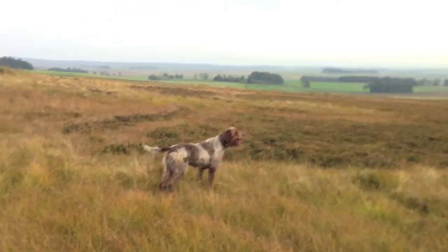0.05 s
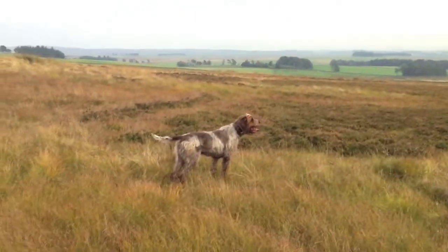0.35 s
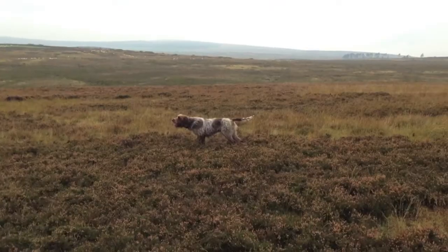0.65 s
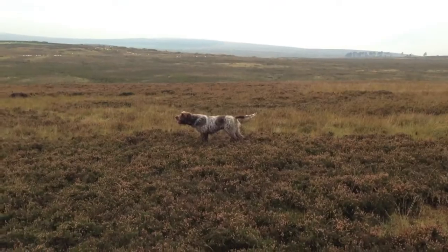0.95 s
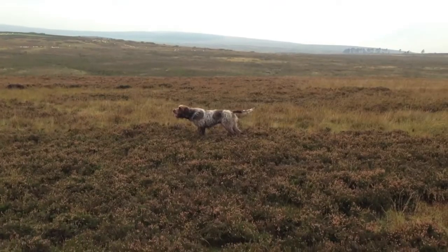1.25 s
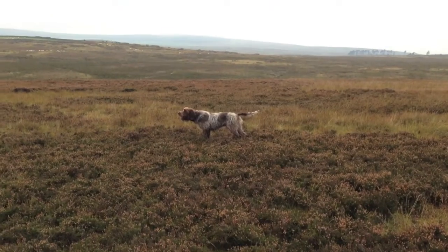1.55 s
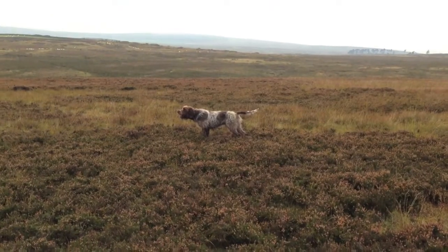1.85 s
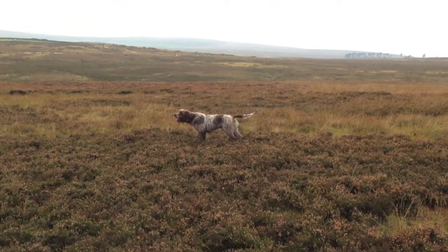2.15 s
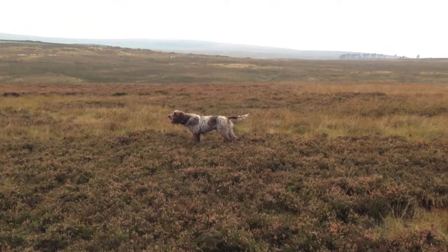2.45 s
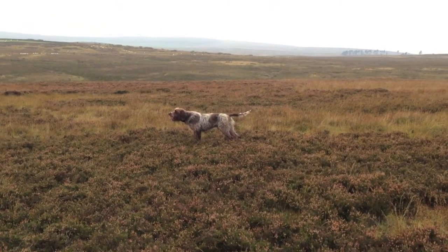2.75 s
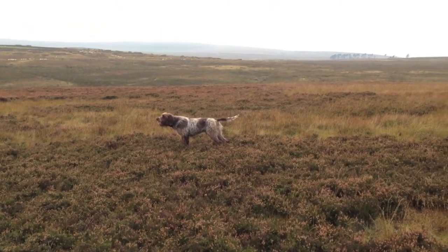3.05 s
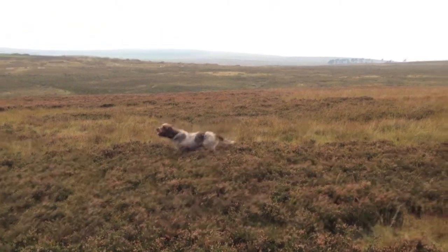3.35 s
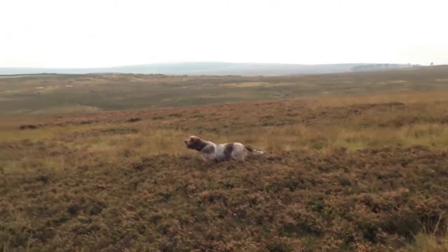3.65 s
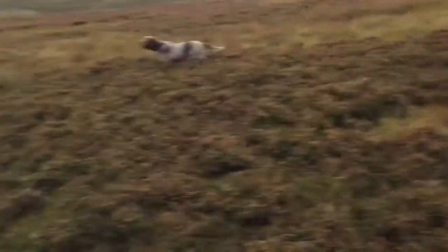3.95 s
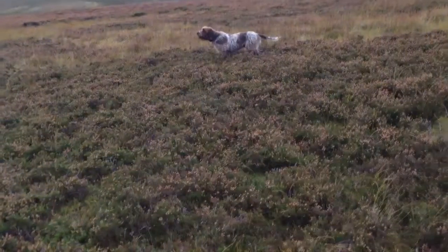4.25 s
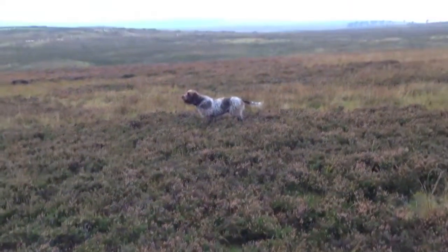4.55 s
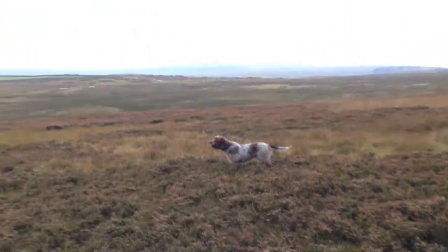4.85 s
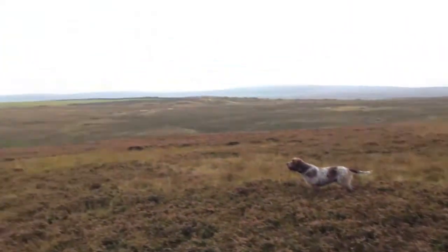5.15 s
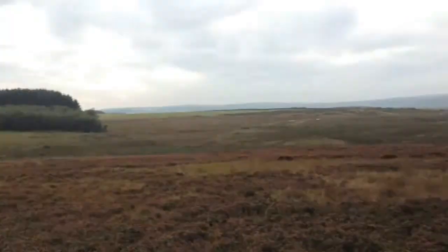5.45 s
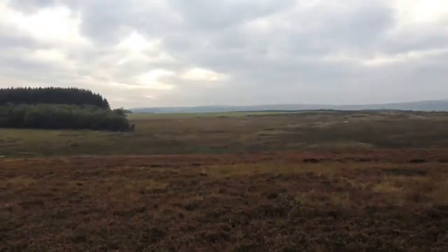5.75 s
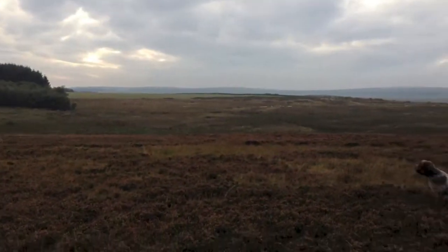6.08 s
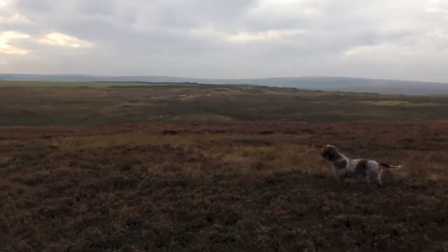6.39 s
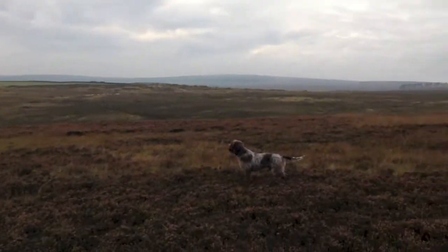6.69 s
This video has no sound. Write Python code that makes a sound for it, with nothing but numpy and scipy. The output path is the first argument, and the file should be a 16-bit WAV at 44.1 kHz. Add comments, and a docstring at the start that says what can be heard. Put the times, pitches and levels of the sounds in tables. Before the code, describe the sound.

Wind thumps on the microphone as a bird takes off with rapid wingbeats, amid rustling heather and snapping twigs.

```python
"""Gusts of wind on an open heather moor hit one small microphone in low, uneven thumps.
A grouse whirrs up, each quick wingbeat squeezing out a whup of air. Heather and grass rustle as
their stems touch, dry twigs snap, and a jacket swishes as its wearer turns and the cloth rubs.
Under it all lie a thin hiss and a few faint, far-off whistles.
Half a second in, the whole sound briefly fades out and comes back."""
import sys
import numpy as np
from scipy import signal
from scipy.fft import rfft, irfft
from scipy.io import wavfile
from scipy.ndimage import uniform_filter1d

SR = 44100
rng = np.random.default_rng(int(sys.argv[2]) if len(sys.argv) > 2 else 0)


def dump_mix(stems):
    """Bounce the given channels to the path in sys.argv[1] as a 16-bit WAV at rate SR."""
    frames = np.atleast_2d(stems).T  # one column per channel
    limited = np.clip(frames, -1, 1)  # hard clip at full scale
    pcm = np.round(limited * 32767).astype(np.int16)
    wavfile.write(sys.argv[1], SR, pcm)


N = 296352

# Tone of still air and microphone hiss; a tone table says how strong the lows and highs are
# (frequency [Hz], level [dB])
HISS_TONE = [(100, -6), (300, 9.5), (600, 1.5), (1300, -4.5), (2000, -2.5), (3000, 1), (4200, 2), (7000, 0),
             (10000, -.5), (15000, -1.86)]
# Far-off whistles (start [s], length [s], pitch [Hz], slide [share of pitch], level [dB])
WHISTLES = [(1.85, 0.38, 1650, .025, -79.5), (1.9, 0.56, 2324, -0.024, -78), (2.245, .5, 2420, 0.0044, -85),
            (2.728, 0.26, 1710, 0.0098, -80)]

# Jacket cloth sliding (start [s], hold [s], level [dB], centre frequency [Hz])
JACKET_RUBS = [(3.815, .02, -55, 2107), (3.865, 0.0354, -57.5, 2734), (4.09, .02, -62, 2200),
               (4.25, 0.051, -64, 2095), (4.43, 0.097, -64, 2000), (4.97, .15, -65.5, 2050),
               (5.3, 0.17, -70.5, 1694), (5.72, .12, -72, 1900)]
# How a rub spreads to either side of its centre (distance from centre [Hz], level [dB])
RUB_SPREAD = [(300, 0), (600, -4.5), (1100, -11.5), (2000, -3.5), (5000, -67)]

# Dry grass hissing in the first gust (time [s], level [dB])
GRASS_LEVELS = [(0, -64), (.04, -63), (.1, -67.5), (.2, -59), (.27, -61.5), (.36, -62.5), (.45, -66.5),
                (.52, -82)]
# Tone of the grass (frequency [Hz], level [dB])
GRASS_TONE = [(300, 0.5), (800, 2.5), (1800, 1.9), (4000, -1), (8000, -3), (15000, -5.5)]
# Heather stirring, building up and settling (time [s], level [dB])
HEATHER_LEVELS = [(0, -99), (3.1, -75.5), (3.22, -65.5), (3.55, -63.5), (3.9, -61), (4.0, -64.5),
                  (4.2, -65), (4.5, -70), (5.3, -71.5), (5.8, -74)]
# Harder brushes through the stems (start [s], hold [s], level [dB])
HEATHER_BRUSHES = [(3.139, 0.014, -61), (3.7, 0.042, -61.5), (3.795, 0.046, -54.5), (3.863, 0.023, -55.5)]
# Tone of the heather (frequency [Hz], level [dB])
HEATHER_TONE = [(250, 0), (550, 5.5), (1000, 1), (2000, 1), (4000, -2.5), (7000, -3.5), (10000, -8),
                (15000, -16)]
# Tone of its dry tips flicking (frequency [Hz], level [dB])
CRACKLE_TONE = [(1000, -14), (3000, -8), (5500, 4.5), (9000, -7), (15000, -6)]
# Twigs ticking and snapping (time [s], level [dB], centre frequency [Hz], band width [Hz], decay [s])
TWIG_SNAPS = [(1.036, -67, 1286, 909, 0.0036), (2.215, -64.5, 3480, 6000, 0.0044),
              (3.209, -57, 4480, 8000, .0018), (3.23, -59.5, 3750, 7100, 0.0052),
              (3.296, -57, 1450, 600, .004), (3.538, -64, 7000, 8100, .002), (3.608, -56, 2160, 2500, .002),
              (3.7, -49.5, 2960, 5440, 0.0011), (3.82, -49, 2320, 1200, .0018),
              (3.827, -41, 2130, 2950, 0.0016), (3.8287, -41, 1160, 1130, 0.0015),
              (3.832, -54, 3340, 3940, 0.00057), (3.8755, -47, 6500, 13000, 0.0007),
              (4.009, -63, 6000, 4000, 0.0036), (4.197, -59, 2300, 1500, 0.0097),
              (4.2018, -35.5, 2340, 1450, 0.001), (4.237, -60, 1700, 1470, 0.0063),
              (4.3335, -57.5, 2730, 3500, 0.0021), (4.48, -49, 2050, 508, 0.0023),
              (4.482, -60.5, 5970, 3990, .0033), (4.621, -64, 4500, 5000, 0.0036),
              (4.788, -54, 2374, 1300, 0.0017), (4.826, -60.5, 4610, 2800, .0033),
              (4.895, -60.5, 2820, 3020, .002), (5.085, -60, 610, 450, .004),
              (5.12, -61, 1830, 1000, 0.0026), (5.31, -64, 1960, 1500, .003),
              (5.74, -60.5, 4870, 1500, 0.0029), (6.239, -64.5, 3200, 1800, .003),
              (6.581, -56, 2600, 1300, 0.0017)]

# Wing strokes (time [s], peak level [dB], pitch [Hz], half length [s], feather swish level [dB])
WINGBEATS = [(3.2968, -37.5, 950, 0.00047, -49.5), (3.359, -35.5, 676, 0.0025, -54),
             (3.4263, -37.5, 537.3, 0.0023, -52), (3.4878, -35, 607, 0.0033, -49.5),
             (3.551, -38.5, 560, 0.0017, -52), (3.617, -41.5, 560, 0.0023, -54),
             (3.681, -42, 565, 0.0021, -60), (3.6990, -27, 486, 0.0012, -47),
             (3.749, -52, 600, 0.0033, -73), (3.7650, -46, 600, 0.0019, -77),
             (3.782, -33.5, 342, 0.00073, -74), (3.797, -32.5, 200, 0.0013, -48.5)]
# Tone of the swishing feathers (frequency [Hz], level [dB])
FEATHER_TONE = [(300, -6), (750, 13.5), (1400, 0), (3000, -4.5), (7000, -8), (15000, -20)]

# Light breeze between the gusts (time [s], rumble level [dB])
BREEZE_LEVELS = [(0, -57), (.73, -67.5), (1.0, -50), (2.3, -63), (3.1, -61.5), (3.9, -53), (4.25, -58.5),
                 (4.55, -71), (4.8, -56.5), (5.6, -53.5), (6.7, -53.5)]
# Gusts hitting the microphone (start [s], hold [s], rumble level [dB], thumping level [dB])
GUSTS = [(0, 0.069, -53.5, -53.5), (0.128, 0.34, -54.5, -57.5), (0.532, 0.038, -45.5, -47.5),
         (.835, 0.048, -47, -55), (1.032, 0.085, -36, -45), (1.184, .32, -44.5, -44),
         (1.53, 0.14, -56.5, -58), (1.788, .021, -44, -56), (2.1, 0.11, -50.5, -57.5),
         (2.54, 0.18, -61, -75), (3.229, .13, -59, -54), (3.443, 0.17, -50.5, -54),
         (3.79, 0.0086, -44, -46.5), (3.934, 0.2, -38.5, -43), (4.873, 0.026, -39, -53.5),
         (4.978, 0.13, -50, -64), (5.308, 0.067, -43, -55.5), (5.399, 0.12, -39.5, -45.5),
         (5.811, 0.052, -35, -36), (5.897, .21, -40, -51), (6.146, 0.082, -40, -39),
         (6.319, 0.068, -41.5, -53.5)]
# Single strong swirls of air (time [s], level [dB], pitch [Hz], half length [cycles])
SWIRLS = [(.340, -36.5, 203, .55), (0.55, -26, 255, 0.23), (0.901, -32, 141, 0.52), (1.032, -28, 175, 0.21),
          (1.106, -26, 220, 0.23), (1.205, -31, 256.8, 0.23), (1.261, -27, 338, 0.33),
          (1.318, -20, 245, 0.32), (1.403, -28.5, 79, 0.26), (1.454, -34.5, 268, 0.56),
          (1.486, -24.5, 260, .36), (1.669, -41.5, 166, 0.4), (1.808, -37.5, 153, 0.23),
          (3.932, -30, 152, 0.37), (3.959, -23, 190, 0.4), (3.997, -13.5, 229, 0.25),
          (4.044, -33, 149, .38), (4.085, -17.5, 293, .29), (4.095, -26, 330, 0.28),
          (4.106, -25.5, 212, 0.31), (4.136, -27.5, 129.8, 0.34), (4.787, -42, 149, 0.46),
          (5.423, -28.5, 124, 0.47), (5.437, -23, 180, 0.25), (5.497, -23.5, 246, 0.25),
          (5.821, -26.5, 216.7, 0.76), (5.832, -20.5, 232, 0.61), (5.857, -17, 169, 0.44),
          (5.937, -26.5, 200, 0.25), (6.083, -33.5, 176, 0.25), (6.176, -27, 250, 0.7),
          (6.189, -30, 320, 0.48), (6.225, -36, 199, 0.53), (6.368, -35, 151, 0.55)]
# Tones of big, middle-sized and tiny swirls in the wind (frequency [Hz], level [dB])
RUMBLE_TONE = [(15, -65), (28, -15.5), (45, -5), (65, 2.5), (100, -4), (135, -10), (200, -34),
               (400, -67)]
THUMP_TONE = [(70, -52), (125, 5.5), (180, 1.5), (250, -4.5), (350, -19), (500, -27.5), (800, -48),
              (1500, -77)]
FLUTTER_TONE = [(150, -10), (280, 5), (430, 5), (600, -11.5), (850, -30), (1500, -70), (3000, -87.5)]

# Overall volume with one brief dip; it scales every level above (time [s], gain [factor])
VOLUME = [(.43, 0.68), (.48, 0.35), (.509, 0.011), (.518, 0.0062), (.53, 0.16), (.6, 0.59)]


def undb(db):
    """Turn decibels into a gain, the number a sound is multiplied by."""
    return 10 ** (np.asarray(db) / 20)


def curve(rows):
    """Join (time, value) points with straight lines, giving a value for every sample."""
    times, values = np.transpose(rows)
    return np.interp(np.arange(N) / SR, times, values)


def unit(x):
    """Scale a sound to an average strength (rms) of 1."""
    return x / np.sqrt(np.mean(x ** 2) + 1e-30)


def colour(x, tone):
    """Shape a sound's lows and highs with a tone table; the result has strength 1."""
    hz, db = np.transpose(tone)
    freqs = np.maximum(np.fft.rfftfreq(N, 1 / SR), 1)
    gain = undb(np.interp(np.log(freqs), np.log(hz), db))
    return unit(irfft(rfft(x) * gain, N))


def band(x, hz, width_hz, order=2):
    """Keep only the frequencies around hz; the result has strength 1."""
    low = np.sqrt(hz ** 2 + (width_hz / 2) ** 2) - width_hz / 2
    edges = [low, min(low + width_hz, SR / 2 - 1000)]
    return unit(signal.sosfilt(signal.butter(order, edges, "band", fs=SR, output="sos"), x))


def noise():
    """White noise: all frequencies equally strong."""
    return rng.standard_normal(N)


def even(x, span_s):
    """Keep the quick flutter of a noise but hold its strength steady over longer spans."""
    size = max(int(span_s * SR), 2)
    power = uniform_filter1d(uniform_filter1d(x ** 2, size), size)
    return x / np.sqrt(power + 1e-9)


def clicks(per_s, spread_db):
    """Random clicks; a bigger spread makes their sizes more unequal."""
    hits = (rng.random(N) < per_s / SR) * noise()
    return hits * undb(spread_db * np.minimum(rng.exponential(size=N), 5))


def swell(start_s, hold_s, rise_s, fall_s):
    """A gain that grows, holds at 1 and dies away."""
    t = np.arange(N) / SR - start_s
    return np.exp(np.minimum(t, 0) / rise_s - np.maximum(t - hold_s, 0) / fall_s)


def together(gains):
    """Joint strength of unrelated sounds: their powers add."""
    return np.sqrt(sum(g ** 2 for g in gains) + 1e-18)


def add(out, start_s, sound):
    """Mix a sound in from the given time."""
    i = max(int(start_s * SR), 0)
    out[i:i + len(sound)] += sound[:N - i]


def hiss():
    """Still air and the microphone itself give a thin, steady hiss."""
    return colour(noise(), HISS_TONE) * undb(-64)


def whistles():
    """Barely audible far-off tones that waver and slide a little in pitch."""
    out = np.zeros(N)
    for start_s, length_s, hz, slide, db in WHISTLES:
        progress = np.linspace(0, 1, int(length_s * SR))
        waver = 0.0033 * unit(uniform_filter1d(rng.standard_normal(len(progress)), size=900))
        pitch = hz * (1 + slide * (progress - .5) + waver)
        tone = np.sin(2 * np.pi * np.cumsum(pitch) / SR)
        add(out, start_s, undb(db) * np.sin(np.pi * progress) * tone)
    return out


def jacket():
    """Threads slip over each other in a broad swish, higher for a faster rub."""
    rubs = [undb(db) * swell(s, hold_s, rise_s=.032, fall_s=.042) for s, hold_s, db, _ in JACKET_RUBS]
    centre_hz = curve([(s + hold_s / 2, hz) for s, hold_s, _, hz in JACKET_RUBS])
    slips = colour(clicks(5000, 0.45), RUB_SPREAD)
    # multiplying by a tone moves the noise up around that tone
    swish = unit(slips * np.cos(2 * np.pi * np.cumsum(centre_hz) / SR))
    return swish * together(rubs)


def grass():
    """Dry blades touch so often that their clicks blur into a smooth hiss."""
    return colour(clicks(20000, 2.4), GRASS_TONE) * undb(curve(GRASS_LEVELS))


def heather():
    """Countless stems touch and scrape in a rustle, and their dry tips flick and crackle."""
    # a stem that springs free scrapes for a millisecond or so
    scrapes = signal.fftconvolve(np.abs(clicks(90, 1.9)), np.hanning(70))[:N] * noise()
    contacts = unit(clicks(5000, 2.6)) + .55 * unit(scrapes)
    stirring = undb(curve(HEATHER_LEVELS))
    brushes = [undb(db) * swell(s, hold_s, rise_s=.005, fall_s=.015)
               for s, hold_s, db in HEATHER_BRUSHES]
    rustle = colour(contacts, HEATHER_TONE) * together([stirring, *brushes])
    crackle = even(colour(clicks(110, 0.86), CRACKLE_TONE), span_s=0.13)
    return rustle + crackle * stirring * undb(-6)


def twigs():
    """Dry stems crack: a snap makes the stem ring, fibres tear briefly, then a faint shiver."""
    out = np.zeros(N)
    t = np.arange(SR // 10) / SR
    for time_s, db, hz, width_hz, decay_s in TWIG_SNAPS:
        ring = band(signal.unit_impulse(len(t)), hz, 1.7 * width_hz, order=4)
        snap = ring / np.abs(ring).max()
        tear = even(band(rng.standard_normal(len(t)), hz, width_hz, order=4), span_s=0.0044)
        rise = 1 - np.exp(-t / 0.00027)
        shiver = undb(-13) * np.exp(-t / 0.0056)
        shape = rise * (np.exp(-t / decay_s) + shiver)
        add(out, time_s, undb(db) * (0.97 * snap + 1.89 * tear * shape))
    return out


def whup(t, hz, half_s, slide):
    """The air pushed by one wing stroke: a short pressure wave that slides in pitch."""
    u = t / half_s
    return np.exp(-u ** 2 / 2) * np.cos(2 * np.pi * hz * t * (1 + slide * u / 2))


def grouse_wings():
    """Each downstroke swishes the feathers and squeezes out a falling whup that bounces off the ground."""
    whups, swish_gain = np.zeros(N), np.zeros(N)
    t = np.arange(-SR // 20, SR // 20) / SR
    for time_s, db, hz, half_s, feather_db in WINGBEATS:
        add(whups, time_s + t[0], undb(db) * whup(t, hz, half_s, slide=-0.099))
        add(swish_gain, time_s + t[0], undb(feather_db) * np.exp(-np.abs(t) / 0.0092))
    feathers = colour(clicks(6000, 1.6), FEATHER_TONE)
    delay = np.arange(SR // 10) / SR
    ground = rng.standard_normal(len(delay)) * np.exp(-delay / 0.015) * (delay > .004)
    bounce = signal.fftconvolve(whups, ground / np.linalg.norm(ground))[:N]
    return whups + undb(-15.5) * bounce + swish_gain * feathers


def swirls():
    """Each strong swirl of air crosses the microphone's opening as one sharp pressure swing."""
    out = np.zeros(N)
    t = np.arange(-SR // 20, SR // 20) / SR
    for time_s, db, hz, cycles in SWIRLS:
        swing = np.cos(2 * np.pi * hz * t + rng.uniform(0, 2 * np.pi))
        add(out, time_s + t[0], undb(db) * swing / np.cosh(t * hz / cycles))
    return out


def wind():
    """Air churns at the microphone: big, slow swirls rumble; stronger flow sheds smaller, higher ones."""
    rumble_gain = undb(curve(BREEZE_LEVELS))
    thump_gain = rumble_gain * undb(-10.5)
    for start_s, hold_s, rumble_db, thump_db in GUSTS:
        gust = swell(start_s, hold_s, rise_s=.017, fall_s=.024)
        rumble_gain = together([rumble_gain, gust * undb(rumble_db)])
        thump_gain = together([thump_gain, gust * undb(thump_db)])
    flutter_gain = undb(-2.5) * thump_gain ** 1.271  # grows faster than the thumping
    rumble = even(colour(noise(), RUMBLE_TONE), span_s=0.053)
    thumps = even(colour(clicks(500, 1.55), THUMP_TONE), span_s=0.038)
    flutter = even(colour(clicks(350, 5.9), FLUTTER_TONE), span_s=0.096)
    flow = rumble * rumble_gain + thumps * thump_gain + flutter * flutter_gain
    # the air arrives in small puffs with lulls between
    puffs_db = 4 * band(noise(), hz=14.3, width_hz=22.5)
    return flow * undb(puffs_db)


def scene():
    """Everything at one microphone, with no walls to echo."""
    mix = wind() + swirls() + grouse_wings() + twigs() + heather() + grass() + jacket()
    return (mix + hiss() + whistles())[None]


def record(dry):
    """The small microphone loses the deepest bass; the volume dips briefly and the top treble is cut."""
    bass_cut = signal.butter(2, 32, "high", fs=SR, output="sos")  # below 32 Hz
    treble_cut = signal.ellip(12, .1, 70, 15400, fs=SR, output="sos")  # steep, above 15400 Hz
    faded = signal.sosfiltfilt(bass_cut, dry) * curve(VOLUME)
    return signal.sosfilt(treble_cut, faded)


dry = scene()
out = record(dry)
dump_mix(out)
```